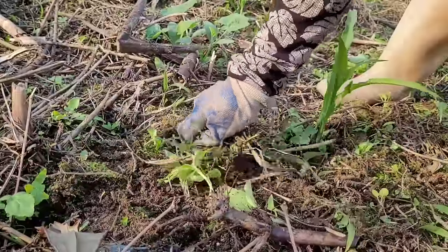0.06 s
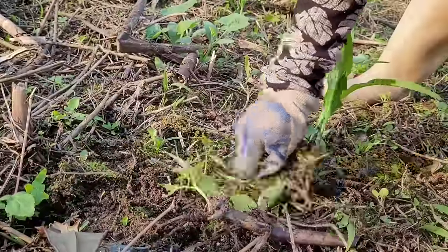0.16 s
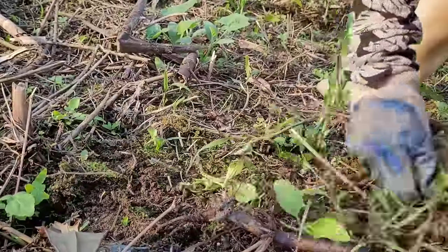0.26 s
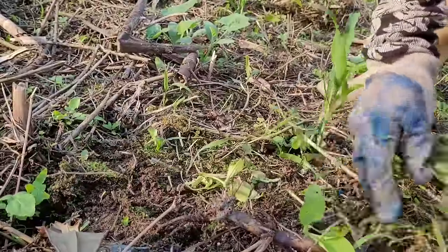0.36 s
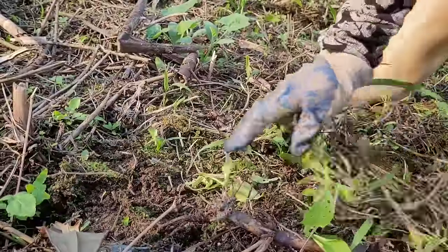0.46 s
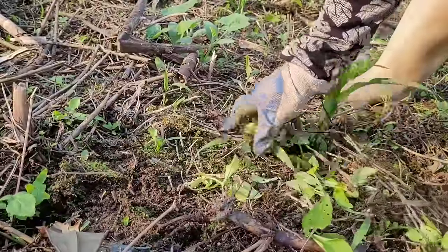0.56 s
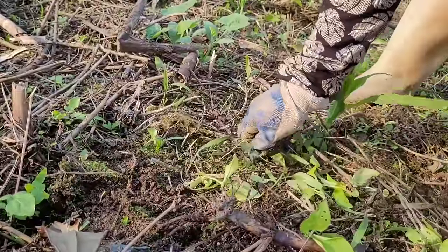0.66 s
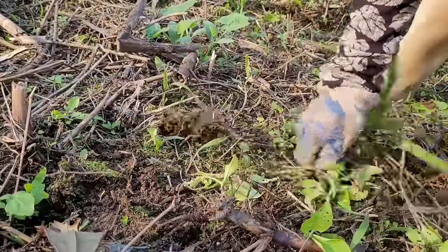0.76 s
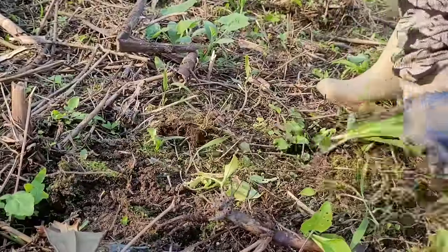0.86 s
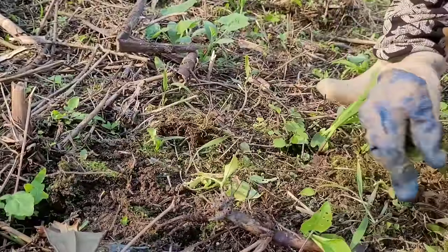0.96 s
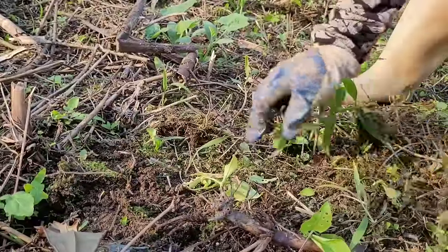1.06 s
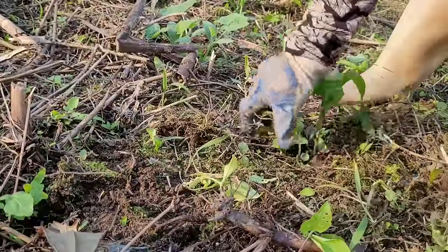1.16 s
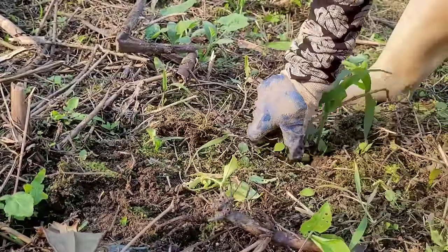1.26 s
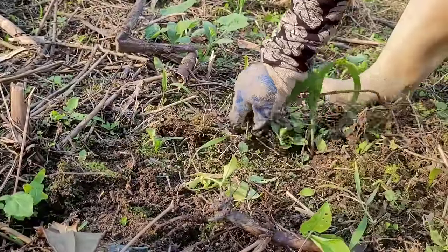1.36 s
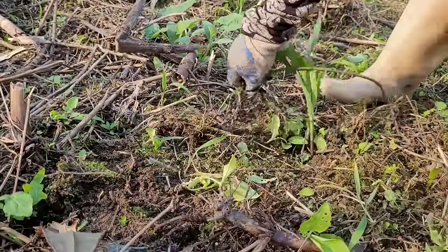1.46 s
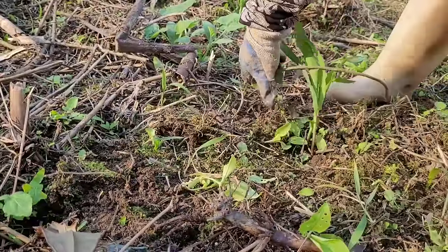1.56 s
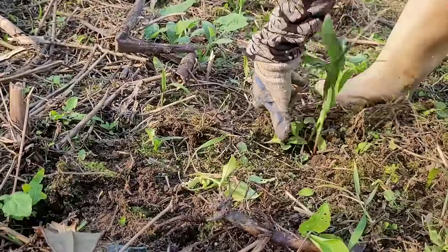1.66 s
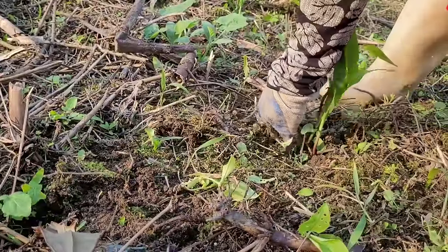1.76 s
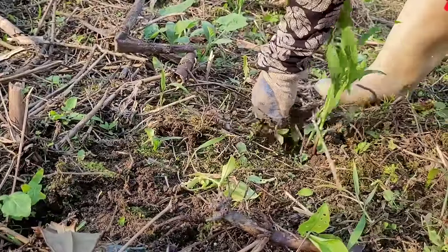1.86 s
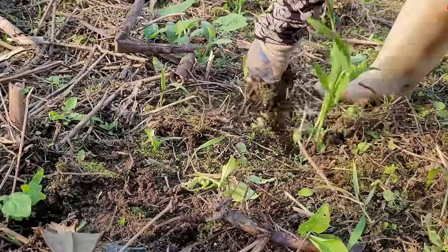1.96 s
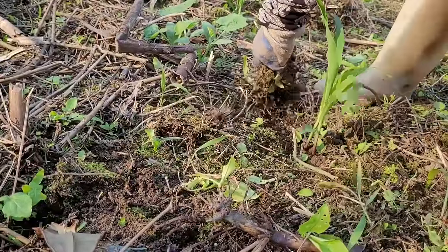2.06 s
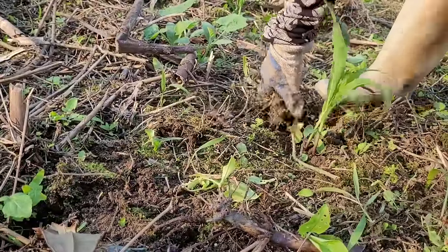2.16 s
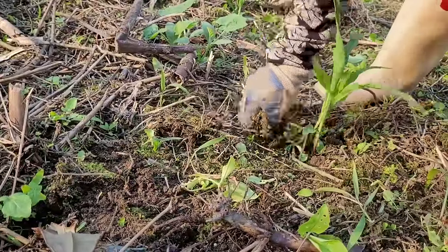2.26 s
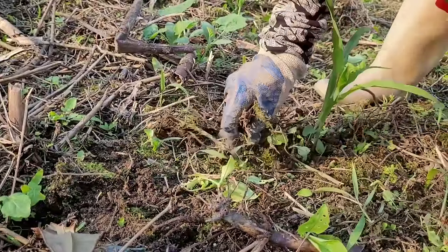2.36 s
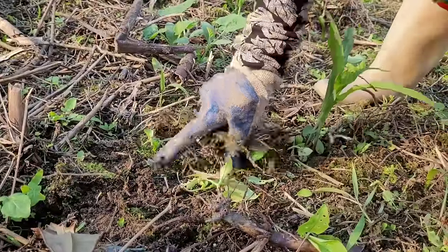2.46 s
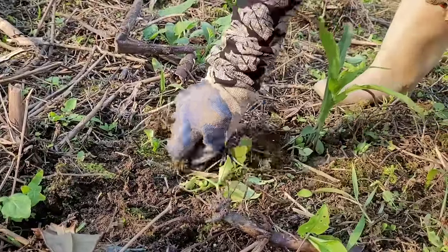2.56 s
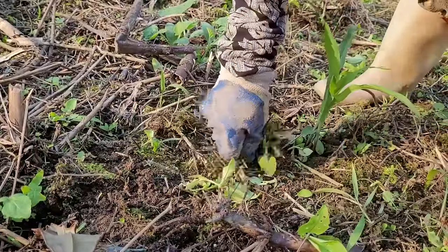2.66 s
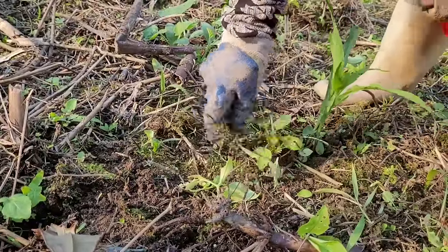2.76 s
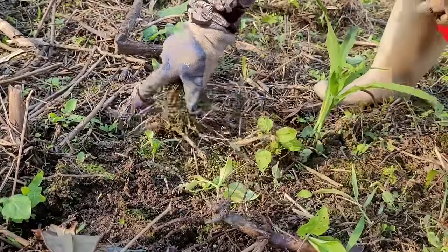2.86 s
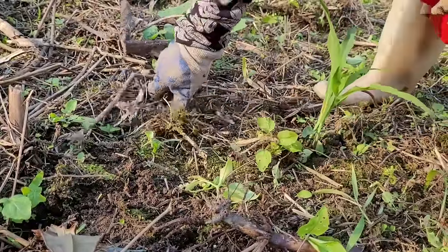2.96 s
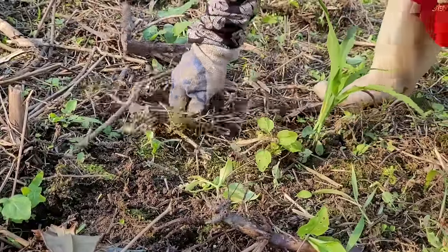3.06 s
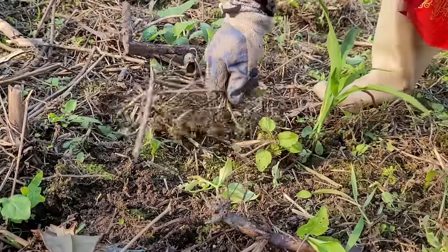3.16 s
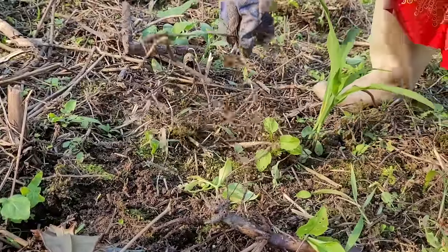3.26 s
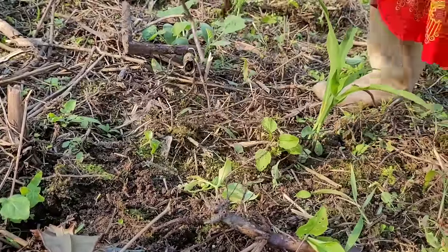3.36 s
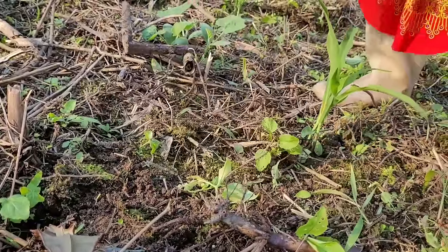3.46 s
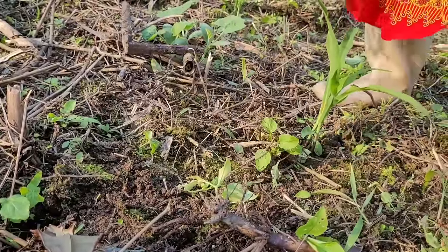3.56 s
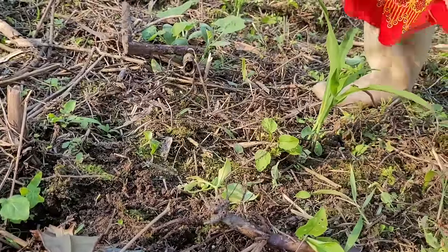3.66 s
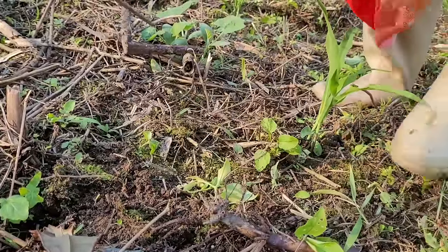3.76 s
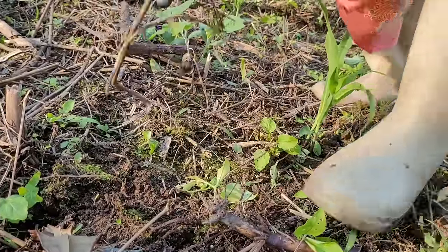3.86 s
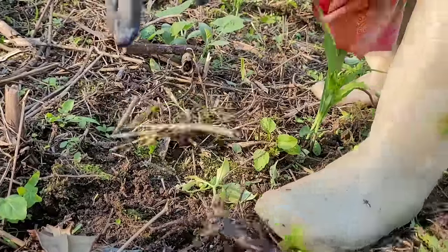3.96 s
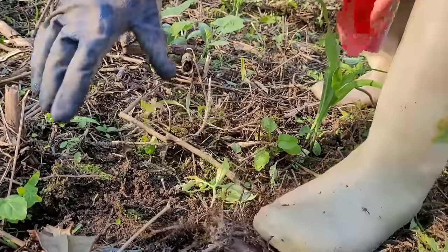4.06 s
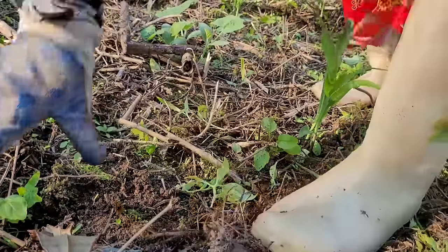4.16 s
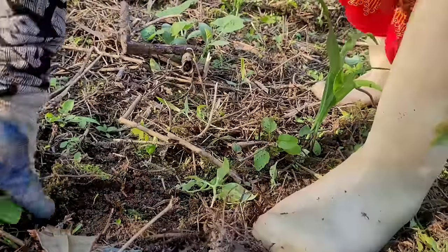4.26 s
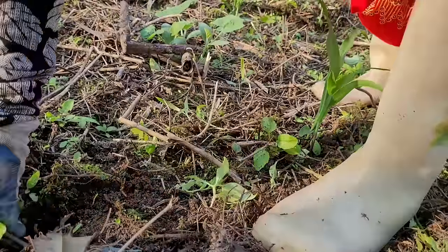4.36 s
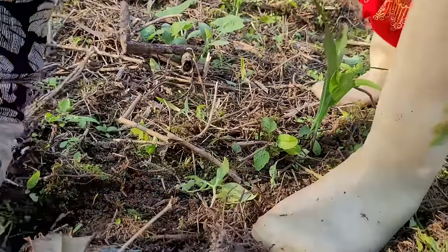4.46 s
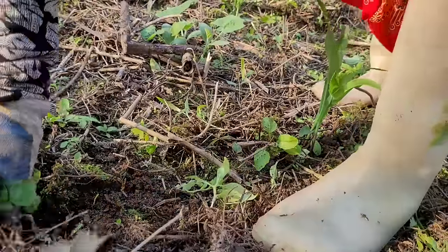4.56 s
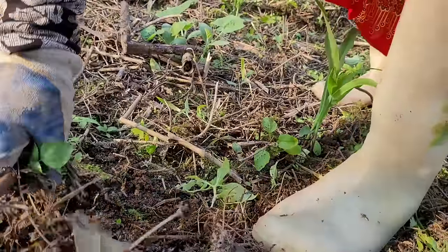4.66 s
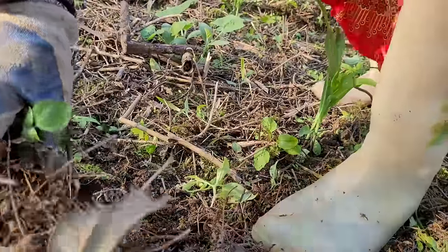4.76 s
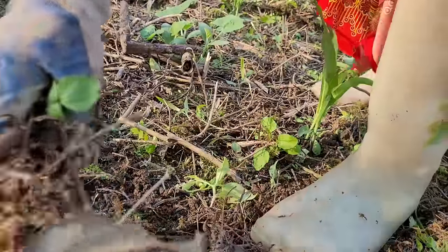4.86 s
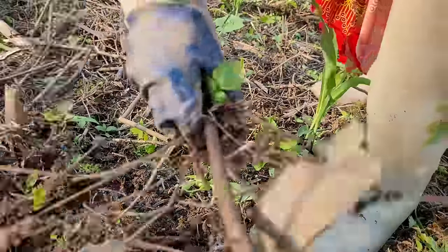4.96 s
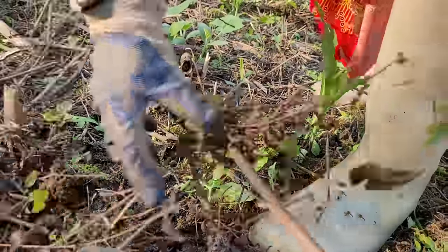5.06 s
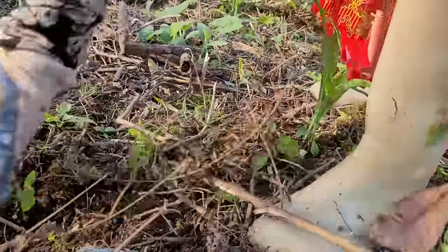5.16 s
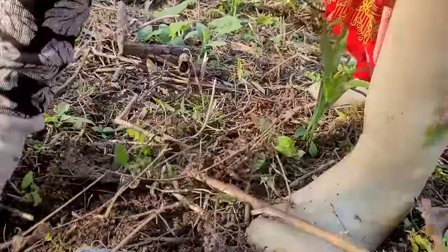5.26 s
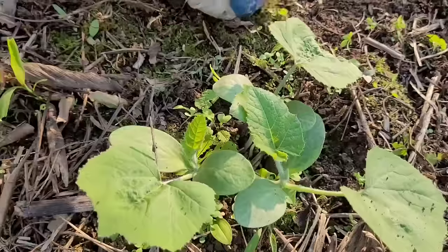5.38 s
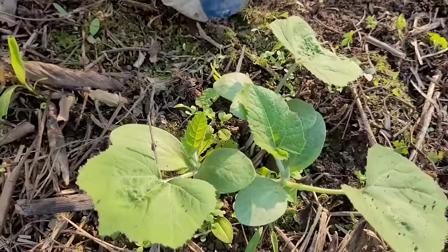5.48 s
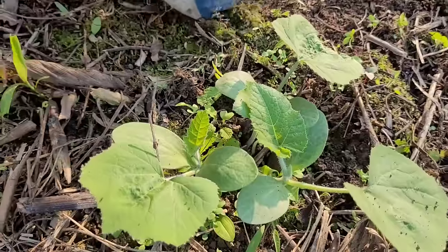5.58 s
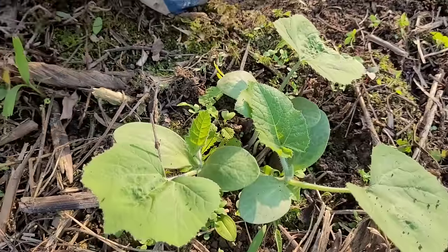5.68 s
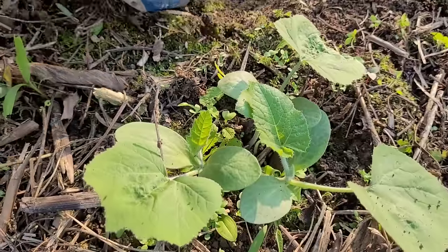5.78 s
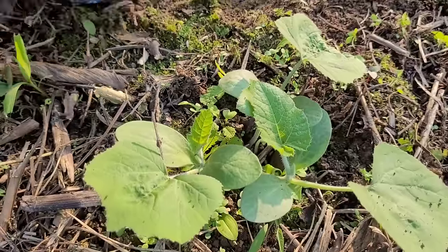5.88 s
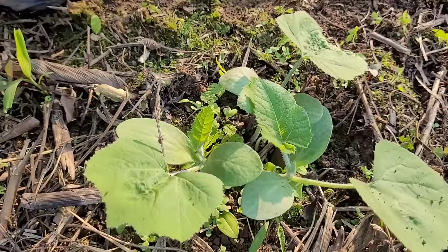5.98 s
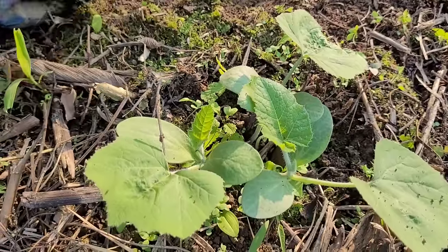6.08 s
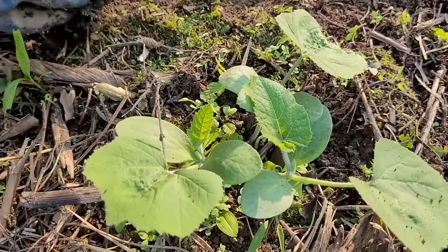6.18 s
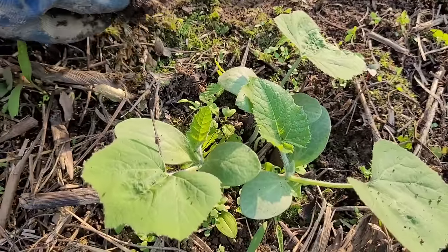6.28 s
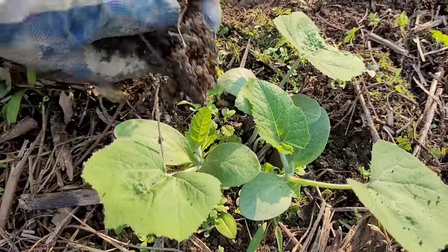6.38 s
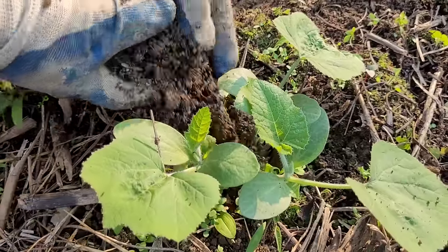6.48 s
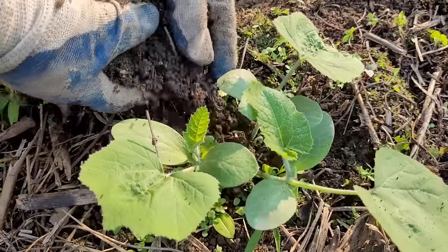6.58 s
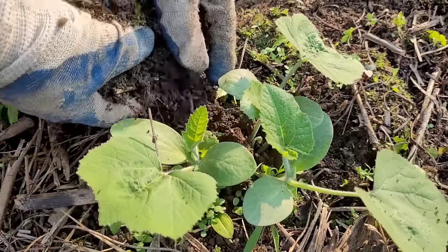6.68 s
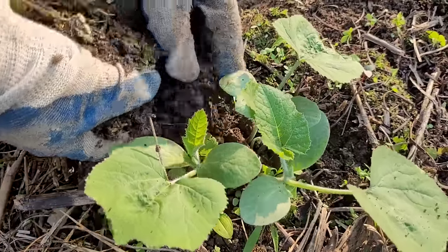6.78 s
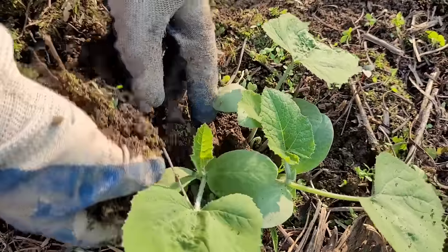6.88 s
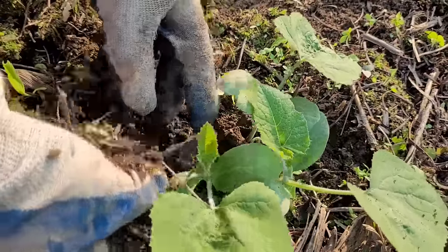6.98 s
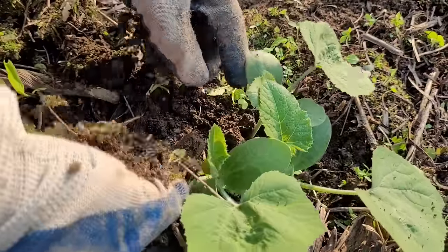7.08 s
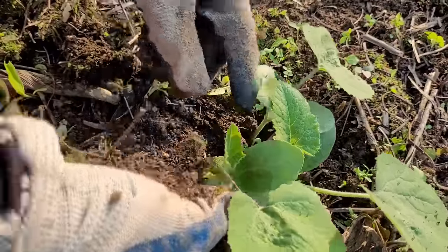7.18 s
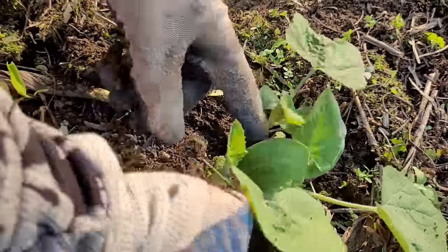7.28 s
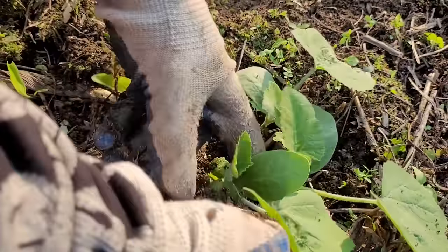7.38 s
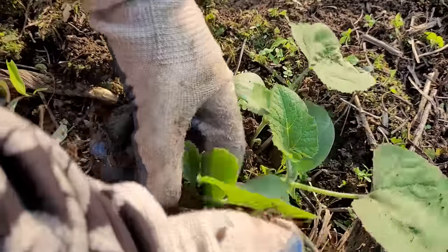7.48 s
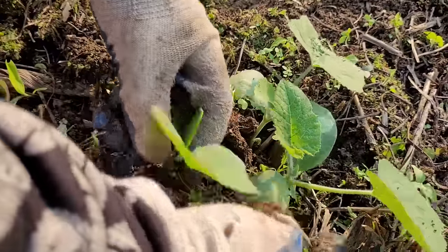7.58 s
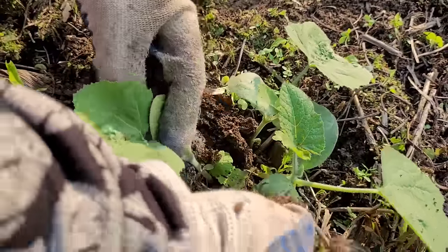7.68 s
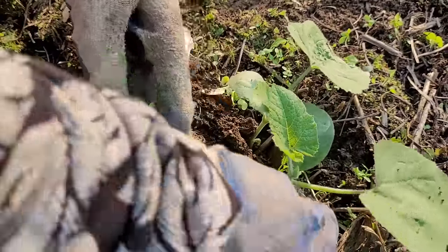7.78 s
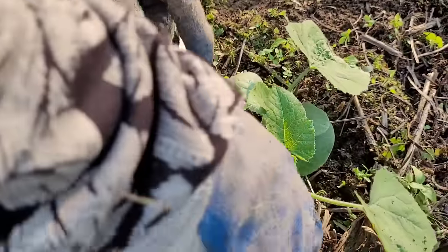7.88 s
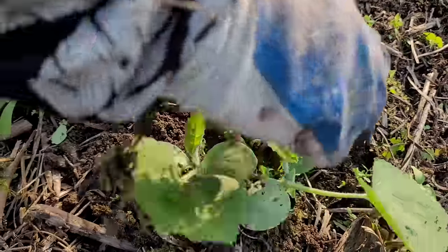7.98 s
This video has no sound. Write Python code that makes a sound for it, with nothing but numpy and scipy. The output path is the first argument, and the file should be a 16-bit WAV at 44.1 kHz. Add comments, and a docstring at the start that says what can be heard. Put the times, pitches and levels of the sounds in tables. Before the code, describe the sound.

Dry stalks crackle and stems snap in uneven handfuls as a gloved hand weeds a garden patch right by the microphone. Soil crumbles and grit bumps the phone. The work pauses briefly, becomes loudest just past the middle with knocking clods and a softly rubbing rubber boot, then continues in lighter rustles. Quiet crickets and a far motor hum carry on in the open air, while a high rasping insect cuts off about halfway.

```python
"""A gloved hand tears weeds and rakes dry stalks and soil, close to a phone with two spaced microphones.
Dense tiny cracks make the rustle, stems snap, a stick and clods knock, grit bumps the phone and a
rubber boot rubs as it settles. Around the patch, crickets and a rasping insect sing over a far motor
hum and faint open-air noise. Twice the sound cuts abruptly, changing the near colour and the insects."""
import sys
import numpy as np
from scipy import signal
from scipy.fft import rfft, irfft, next_fast_len
from scipy.io import wavfile
from scipy.ndimage import uniform_filter1d

SR = 44100
rng = np.random.default_rng(int(sys.argv[2]) if len(sys.argv) > 2 else 0)


def store_pcm(level_fs):
    """Save levels as 16-bit WAV."""
    pcm = np.round(np.clip(level_fs, -1, 1) * 32767).astype(np.int16)
    wavfile.write(sys.argv[1], SR, np.atleast_2d(pcm).T)


N = 354123
TIME = np.arange(N) / SR
CUTS_S = (4.376, 5.468)  # the sound jumps abruptly to a new shot


def undb(db):
    """Decibels to gain."""
    return 10 ** (np.asarray(db) / 20)


def unit(x):
    """Scale to rms 1."""
    return x / np.sqrt(np.mean(x ** 2))


def curve(points, s=TIME):
    """Read a line through (seconds, value) points at s."""
    return np.interp(s, *np.transpose(points))


def colour(x, points):
    """Shape a spectrum by (Hz, dB) points; negative dB at either end doubles beyond it."""
    hz, db = np.transpose(points)
    size = next_fast_len(x.shape[-1])
    log_hz = np.log(np.arange(size // 2 + 1) * SR / size + 1)
    gain = undb(np.interp(log_hz, np.log(hz), db, left=min(db[0], 0) * 2, right=min(db[-1] * 2, db[-1])))
    return irfft(rfft(x, size) * gain, size)[..., :x.shape[-1]]


def band(x, hz, width_hz):
    """A peak that is 20 dB down width_hz to either side; rms 1."""
    return unit(colour(x, [(hz - width_hz, -20), (hz, 0), (hz + width_hz, -20)]))


def walk(rate):
    """Random levels held 1 / rate s and smoothed twice; rms 1."""
    hold = max(int(SR / rate), 2)
    steps = np.repeat(rng.standard_normal(N // hold + 1), hold)
    return unit(uniform_filter1d(uniform_filter1d(steps, hold), hold)[:N])


def sides(pan_db):
    """Left and right gains for a pan, which is left minus right in dB."""
    return undb(np.array([pan_db, -pan_db]) / 2)


def add(out, x, s):
    """Mix a short stereo sound in at s seconds."""
    i = int(s * SR)
    out[:, i:i + x.shape[1]] += x[:, :N - i]


# The hand works nearer the left microphone. Each row: time in seconds, left lead in ms.
LEFT_LEAD = [(0, .07), (3.3, .08), (3.7, 0), (4.0, .26), (4.95, .27), (5.1, 0), (5.45, .1), (5.6, .22),
             (8.03, .16)]
def pair(x, s=TIME, offset_ms=0):
    """A near source at both microphones, the right one late by the lead at s seconds plus offset_ms."""
    lead_ms = curve(LEFT_LEAD, s) + offset_ms
    late = np.arange(len(x)) - np.round(lead_ms * SR / 1000).astype(int)
    return np.array([x, x[late % len(x)]])


def strokes(rows):
    """A time grid and each gesture's power on it: a rise, a hold and a fall, at most 10 dB in 5 ms."""
    start, db, rise, hold, fall = (column[:, None] for column in np.transpose(rows)[:5])
    t = np.arange(0, N / SR + .002, .001)
    early = np.maximum(start - t, 0) / np.maximum(rise, .005)
    late = np.maximum(t - start - np.maximum(hold, 0), 0) / np.maximum(fall, .005)
    return t, undb(db - 10 * early - 10 * late) ** 2


def cracks(per_s, spread_db, decay_ms, patchy_db, spots=3):
    """Tiny random breaks, each a puff of noise, from spots at different angles to the microphones."""
    out, patchy = 0, undb(patchy_db * walk(25))
    pole, chance = np.exp(-1000 / (decay_ms * SR)), per_s / spots / SR
    for spot in np.linspace(-1, 1, spots):
        draw = rng.random(N)
        hit = np.flatnonzero(draw < chance)
        breaks = np.zeros(N)
        breaks[hit] = undb(spread_db * np.minimum(-np.log(draw[hit] / chance), 4.5))  # few are large
        puffs = signal.lfilter([1], [1, -pole], breaks) * patchy
        out = out + pair(puffs * rng.standard_normal(N), offset_ms=.08 * spot)
    return unit(out)


def chips(low_hz, high_hz, per_s, cycles, spread_db=4, sizes=10):
    """Crumbs and splinters of many sizes, each ringing a few cycles at its own pitch as it breaks."""
    out, chance = 0, per_s / sizes / SR
    for place in (np.arange(sizes) + rng.random(sizes)) / sizes:
        hz = low_hz * (high_hz / low_hz) ** place
        draw = rng.random(N)
        breaks = (draw < chance) * undb(spread_db * np.minimum(-np.log(draw / chance + 1e-9), 3.5))
        pole = np.exp(-hz / (cycles * SR))
        resonator = [1, -2 * pole * np.cos(2 * np.pi * hz / SR), pole ** 2]
        out = out + unit(signal.lfilter([1, -1], resonator, breaks))
    return unit(pair(out))


# Grabs, tears and rakes, close in. Each row: time of full strength in seconds, crackle level in dB,
# rise in seconds per 10 dB, hold in seconds, fall in seconds per 10 dB, then chaff, glove and soil
# in dB relative to the crackle.
GRABS = [(.001, -54, .02, 0.028, 0.022, 2, -8, -28), (.052, -50.5, 0.022, 0, 0.023, 6, -4.5, -12),
         (0.111, -48, 0.031, 0, 0.018, 3, -4, -12), (0.214, -50, 0.07, 0.078, 0.05, 3, -3, -13.5),
         (.447, -54.5, 0.18, 0.016, 0.069, -4, -8.5, -21), (.564, -55, 0.081, 0, 0.039, -1.5, -14, -39),
         (0.652, -56.5, 0.0047, 0.089, 0.025, 5, -5, -22), (.819, -52, 0.051, 0.084, 0.084, 1, -4.5, -12),
         (1.392, -55.5, 0.013, 0.011, 0.079, 4, -7, -12.5),
         (1.45, -55.5, 0.026, 0.069, 0.048, 4, -10, -12.5),
         (1.741, -54.5, 0.0096, 0.015, 0.082, 1, -3.5, -5), (1.89, -56, 0.096, 0.026, 0.13, 0.5, -3.5, -31),
         (2.05, -51.5, 0.039, 0.0028, 0.041, 6.5, -7.5, -33),
         (2.332, -52, 0.037, 0.0021, 0.078, 2, -6, -10), (2.42, -59, 0.014, 0.015, 0.037, 3, -5, -2.5),
         (2.641, -58.5, 0.045, 0.0039, 0.011, 9, -6.5, -19),
         (2.699, -58.5, 0.036, 0.034, 0.035, -1, -0.5, -15),
         (3.005, -47.5, 0.039, 0.0056, 0.037, 2, -5.5, -12.5),
         (3.079, -51, 0.027, 0.0048, 0.021, 5, -2.5, -7), (3.17, -52.5, 0.13, 0, 0.049, 5, -7.5, -13),
         (3.255, -58, 0.06, 0, 0.1, 4.5, -9, -30), (3.474, -64, 0.14, 0.0056, 0.15, 4.5, -11.5, -9),
         (4.031, -44.5, 0.045, 0.0031, 0.04, -0.5, -8.5, -6),
         (4.1, -58.5, 0.025, 0.059, 0.21, -1, -5.5, -3.5),
         (4.379, -48, 0.0041, 0.035, 0.14, 2.5, -11.5, -15),
         (4.554, -44.5, 0.099, 0.044, 0.021, 4.5, -6.5, -11),
         (4.635, -43, 0.023, 0.034, .05, 1.5, -8, -10.5), (4.728, -38.5, 0.044, 0, 0.12, 0, -10, -19),
         (4.86, -46.5, 0.061, 0.075, 0.06, 0.5, -10.5, -19.5),
         (4.985, -40, 0.055, 0.027, 0.05, 2, -10.5, -15), (5.05, -48.5, 0.048, 0, 0.076, 8.5, -3.5, -26),
         (5.156, -54, 0.042, 0, 0.024, -5, 3.5, 1.5), (5.2, -41, 0.044, 0.0043, 0.033, 2.5, -6, -4),
         (5.3, -52, 0.19, 0.081, 0.044, -1.5, -4, -9.5), (5.456, -49.5, 0.021, 0, 0.007, -5, 0, -6),
         (5.566, -57, 0.039, 0.0019, 0.093, 0, -15.5, -14.5), (5.737, -56, 0.085, 0.28, 0.35, 1, -15, -19),
         (5.953, -46.5, 0.015, 0, 0.025, 2, -18, -32), (6.024, -43.5, 0.061, 0.023, 0.15, 4, -8.5, -17.5),
         (6.254, -53, 0.12, 0.0014, 0.035, -10, -8.5, -14), (6.3, -53.5, 0.11, 0.28, 0.19, 3, -10.5, -21),
         (6.871, -55.5, 0.16, 0, 0.028, -25, -33, -17), (6.913, -42.5, 0.018, 0, 0.033, -8, -9.5, -15.5),
         (6.959, -48, 0.017, 0.1, 0.038, -0.5, -9.5, -25),
         (7.236, -49.5, 0.014, 0.047, .02, 0.5, -11.5, -37), (7.33, -52, 0.035, 0.0078, 0.011, -3, -9, -32),
         (7.372, -45, 0.0087, 0.0098, 0.019, -1, -8.5, -33),
         (7.42, -54.5, 0.027, 0.096, 0.18, -0.5, -10, -35),
         (7.837, -47.5, 0.026, 0.0055, 0.08, -1.5, -13.5, -48), (8.026, -50.5, 0.063, 0, .1, 0, -18, -21)]
# Loose litter settling between grabs. Each row: time in seconds, crackle level in dB.
SETTLING = [(0, -68), (1.0, -59.5), (1.3, -64.5), (1.7, -63), (2.2, -62.5), (2.9, -64), (3.4, -69),
            (3.7, -69.5), (3.94, -60.5), (4.35, -74), (5.45, -55.5), (5.52, -65), (6.75, -71),
            (7.16, -56.5), (7.75, -61.5), (8.03, -56)]
# The lower part of the stalk crackle, near 4 kHz, swelling and fading.
# Each row: time in seconds, level in dB relative to the crackle.
LOW_CRACKLE_LEVEL = [(0, -7.5), (1.0, -9.5), (2.0, -7), (3.0, -7), (3.9, -10.5), (4.35, -4), (4.8, -9),
                     (5.2, -12), (5.5, -11), (6.3, -8.5), (6.9, -16.5), (8.03, -13)]
# Where the hand works in front of the phone. Each row: time in seconds, pan in dB.
HAND_PAN = [(0, -1), (2.9, -0.5), (3.1, 0.5), (3.6, -3.5), (4.4, 1), (5.0, 0.5), (5.45, -0.5), (5.55, -2.5),
            (6.2, -0.5), (6.9, -0.5), (7.1, -1.5), (8.03, -2.5)]
# The four materials at close range. Each row: frequency in Hz, gain in dB.
STALK_SPECTRUM = [(2500, -32), (3500, -27.5), (4500, 1.5), (6000, 1), (7500, 2), (9500, -0.5),
                  (11500, -22.5)]
CHAFF_SPECTRUM = [(8500, -14.5), (10500, 3), (12500, 4), (15000, 2), (16000, -2)]
GLOVE_SPECTRUM = [(500, -10.5), (800, -7), (1100, -6), (1600, -5.5), (2600, 1), (3300, 0), (4500, -50)]
SOIL_SPECTRUM = [(70, -6), (150, -4.5), (260, 1), (550, 3), (900, -3), (1500, -6)]
def hand():
    """Stalks and dry chaff crackle, the glove scrapes, soil crumbles, all shaken by the same cracks."""
    t, grab_power = strokes(GRABS)
    power = np.vstack([grab_power, undb(curve(SETTLING, t)) ** 2])
    settling_shares_db = [-1.5, -16, -33]  # chaff, glove, soil
    shares = undb(np.vstack([np.array(GRABS)[:, 5:], settling_shares_db]).T) ** 2
    gains = [np.interp(TIME, t, np.sqrt(p)) for p in (power.sum(axis=0), *(shares @ power))]
    fine = cracks(per_s=1100, spread_db=3.1, decay_ms=.7, patchy_db=2)
    coarse = cracks(per_s=500, spread_db=3, decay_ms=3.5, patchy_db=3.5)
    scattered = rng.standard_normal((2, N)) * undb(2.5 * walk(26))  # thrown back by the litter all round
    stalks = unit(colour(fine + .9 * scattered, STALK_SPECTRUM))
    low_crackle = band(fine + 1.3 * coarse + 1.03 * scattered, hz=3940, width_hz=1290)
    stalks += undb(curve(LOW_CRACKLE_LEVEL)) * low_crackle
    stalks += undb(-8.5) * chips(low_hz=4270, high_hz=11900, per_s=420, cycles=11)
    chaff = unit(colour(fine + 1.05 * scattered, CHAFF_SPECTRUM))
    glove = unit(colour(.45 * fine + .5 * coarse + 1.13 * scattered, GLOVE_SPECTRUM))
    glove += undb(-11) * chips(low_hz=594, high_hz=3290, per_s=220, cycles=5.2)
    soil = unit(colour(.42 * fine + coarse, SOIL_SPECTRUM))
    rustle = sum(gain * layer for gain, layer in zip(gains, (stalks, chaff, glove, soil)))
    return rustle * sides(curve(HAND_PAN))


# The cricket chorus, off to the right. Each row: frequency in Hz, gain in dB.
CRICKETS_BLURRED = [(4100, -22), (4500, -8), (4950, -3), (5110, 0), (5300, -4), (5600, -10), (6000, -24)]
CRICKETS_SHARP = [(4600, -26), (4940, -13), (5035, 0), (5100, -7), (5170, -4), (5280, -14), (5700, -26)]
# Its strength at the phone. Each row: time in seconds, level in dB.
CRICKET_LEVEL = [(0, -64.5), (2.8, -65.5), (3.6, -68), (5.46, -67), (5.48, -65), (8.03, -64.5)]
def crickets():
    """Many crickets merge into a steady band of noise, sharper after the second cut."""
    blurred = unit(colour(rng.standard_normal((2, N)), CRICKETS_BLURRED))
    sharp = unit(colour(rng.standard_normal((2, N)), CRICKETS_SHARP))
    chorus = np.where(TIME < CUTS_S[1], blurred, sharp)
    return chorus * undb(curve(CRICKET_LEVEL) + 1.5 * walk(4.1)) * sides(pan_db=-4)[:, None]


# One insect, equally loud at both microphones. Each row: frequency in Hz, gain in dB.
RASP_SPECTRUM = [(6300, -26), (6750, -3), (7100, -3), (7700, -16), (8200, -4), (8600, -2), (9100, -14),
                 (10200, -8), (11500, -16), (13000, -11), (14500, -24)]
# Its strength at the phone. Each row: time in seconds, level during a pulse in dB.
RASP_LEVEL = [(0, -66), (2.2, -65.5), (3.2, -64.5), (3.6, -63), (4.0, -63), (4.4, -65)]
def rasping_insect(pulse_hz=17, peak_s=3.665):
    """A high rasp that pulses until the first cut."""
    pulses = np.clip(.45 + 1.1 * np.cos(2 * np.pi * pulse_hz * (TIME - peak_s)), 0, 1)
    rasp = unit(colour(rng.standard_normal((2, N)), RASP_SPECTRUM)) * pulses * (TIME < CUTS_S[0])
    return rasp * undb(curve(RASP_LEVEL) + walk(8))


# Open air all round the patch. Each row: frequency in Hz, gain in dB.
AIR_SPECTRUM = [(20, -37), (35, 0), (60, -2), (120, -6), (250, -7), (380, -12), (550, -17), (900, -26),
                (1600, -33), (2500, -20), (3500, -20.5), (5500, -4), (10000, -26), (15500, -17.5)]
def air(level_db=-66):
    """Faint outdoor noise, more alike at the two microphones in the bass than in the treble."""
    shared = colour(rng.standard_normal(N), [(20, -5.5), (400, -1), (1500, -12)])
    separate = colour(rng.standard_normal((2, N)), [(20, -2.5), (300, -4), (1200, 3.5)])
    return undb(level_db + .25 * walk(7.8)) * unit(colour(shared + separate, AIR_SPECTRUM))


# A motor far off, the same at both microphones. Each row: frequency in Hz, typical rms level in dB.
MOTOR_TONES = [(53.8, -80), (106, -83.5), (148, -89)]
def motor():
    """A low hum whose tones waver together in pitch and separately in level."""
    wavering_s = TIME + .00083 * walk(4.5)
    return sum(np.sqrt(2) * undb(db + 2.8 * walk(6)) * np.sin(2 * np.pi * hz * wavering_s)
               for hz, db in MOTOR_TONES)


def small_stems(per_s=3, level_db=-48, spread_db=5):
    """Rows like those of STEM_SNAPS for small stems that break at random."""
    when, size, pan, low = rng.random((int(per_s * N / SR), 4)).T
    start_s = .015 + when * (N / SR - .02)
    db = level_db + spread_db * (2 * size - 1)
    pan_db, body_db, shiver_db = 6 * (2 * pan - 1), -30 + 12 * low, np.full_like(when, -18)
    return np.transpose([start_s, db, pan_db, body_db, shiver_db])


def flatten(burst):
    """Level out the broad bumps in a burst's spectrum: a clean break sounds at all pitches alike."""
    spectrum = rfft(burst)
    local_power = uniform_filter1d(abs(spectrum) ** 2, size=31, axis=-1)
    return irfft(spectrum / np.sqrt(local_power), burst.shape[-1])


# Stems breaking close to the phone. Each row: time in seconds, peak level of the crack in dB, pan in dB,
# then low body and trailing shiver in dB relative to the crack.
STEM_SNAPS = [(.0125, -26, -0.5, -10, -9), (.0487, -24, 0, -15, -23), (.0838, -28, 5, -27, -20),
              (.116, -33, 2, -8.5, -10), (.445, -37.5, -2, -7, -22), (.7999, -14, -1, -10.5, -16),
              (.817, -27, 11, -27, -29), (1.116, -42, 0, -35, -10), (1.1575, -41, -5, -30, -8),
              (1.219, -42, 2, -30, -8), (1.292, -43, 0, -30, -3), (1.3838, -33, 4, -30, -20),
              (1.3957, -32, 3, -35, -22), (1.462, -40, 4, -30, -15), (1.4933, -29, 5, -38, -10),
              (1.664, -42, 3, -35, -8), (1.7293, -12, 5, -9.5, -16), (1.771, -44, 1, -13, -20),
              (1.816, -36, 0, -15, -20), (1.868, -39, 0, -30, -12), (1.8866, -44, -2, -1.5, -20),
              (1.9475, -30, -3.5, -10, -11), (1.966, -40, 0, -25, -15), (2.054, -43, 0, -15, -12),
              (2.3411, -30, 0, -27, -10), (2.4205, -39.5, -2, -2.5, -8), (2.447, -38, -2, -30, -15),
              (2.6354, -33, 3, -36, -1), (2.699, -37, 3, -30, -8), (2.8917, -37.5, -1, -21, -7),
              (2.9205, -36, 10, -20, -30), (2.9664, -32.5, 3, -24, -15), (2.996, -35, -2, -14, -20),
              (3.015, -35, 0, -7, -15), (3.056, -35.5, 9, -6, -12), (3.0797, -18, -3, -27, -20),
              (3.2535, -41, 10, -12, -7), (3.527, -44, -8, -14, -12), (3.9303, -41, 2, -23, -18),
              (4.018, -30, -1, -2.5, 1), (4.041, -28, 1, -9, -22), (4.1026, -35, 3, -7.5, -10),
              (4.1145, -33.5, 1, -21, -9), (4.1455, -34, -4, -9, -22), (4.156, -39, 1, -12, -20),
              (4.225, -42.5, 7, -6, -23), (4.234, -41.5, -9, -4, -30), (4.303, -41, -3, -38.5, -23),
              (4.3774, -49, -2, -21, -18.5), (4.5435, -28, 0, -26, -20), (4.555, -32, 2, -23, -15),
              (4.5762, -27, 6, -5.5, -8), (4.588, -31, -2, -15, -18), (4.6262, -9, -6, -18, -16),
              (4.6273, -14, 4.5, -16, -9), (4.7149, -17, 0, -34, -20), (4.793, -26, 0, -25, -18),
              (4.877, -30, 2, -25, -18), (4.8995, -28, 1, -17, -17), (4.9651, -26, 3.5, -25, -12),
              (4.973, -30, 5, -22, -15), (4.9865, -15, -11, -22, -22), (4.993, -32, -3, -24, -16),
              (5.0052, -11.5, -1, -6, -13), (5.089, -33.5, 1, -30, -20), (5.1493, -34, -5, 2, -21),
              (5.173, -30, 5, -19, -18), (5.2003, -24.5, -9.5, 1, 24), (5.3262, -12, -1.5, -20, -25),
              (5.3457, -23, 12.5, -15.5, -24), (5.4438, -15, 3, -18, -32), (5.4449, -13, 4.5, -27, -16),
              (5.463, -31, 0, -15, -22), (5.5959, -39, -6, -27, -7), (5.8396, -32, 1, -18, -6),
              (5.9522, -33, 6, -29, -15), (6.0085, -23.5, 2, -23, -2.5), (6.2387, -32, 2, -29, -12),
              (6.634, -38, -5, -35, -23), (6.666, -46, -7, -32, -22), (6.689, -42, -8, -30, -24),
              (6.774, -42, -10, -44, -17), (6.8108, -32.5, 1, -21, -10), (6.837, -41, -10, -31, -18),
              (6.9037, -28, -7, -24, -9), (6.92, -37, 4, -6, -12), (7.237, -30, -3, -43, -16),
              (7.27, -37, -8, -30, -14), (7.3627, -29, -7, -13, 17), (7.4644, -45, -8, -30, -20),
              (7.8332, -29, -10, -22, 5), (8.0016, -34, -9, -35, -17)]
# The upper and lower parts of a snap. Each row: frequency in Hz, gain in dB.
CRACK_SPECTRUM = [(2500, -35), (4000, -1), (7500, 6.5), (10000, 3), (15000, 5.5), (16000, -5)]
BODY_SPECTRUM = [(350, -13.5), (700, -5), (1200, -0.5), (2000, -2), (3000, 1), (4200, -12), (5500, -30)]
def snaps(rise_ms=.34, shiver_ms=4.2, length=2048):
    """A stem breaks in a brief burst of noise, and its fibres shiver after it."""
    out = np.zeros((2, N))
    ms = np.arange(length) * 1000 / SR - 4  # the break comes 4 ms in
    rise, after = np.exp(np.minimum(ms, 0) / rise_ms), np.maximum(ms, 0)
    for s, db, pan_db, body_db, shiver_db in [*STEM_SNAPS, *small_stems()]:
        decay_ms = max(.91 - .1743 * (db + 24.5), .2)  # louder stems crack faster
        crack = rise * np.exp(-after / decay_ms)
        shiver = rise * undb(shiver_db) * np.exp(-after / shiver_ms)
        direct, scattered = rng.standard_normal(length), rng.standard_normal((2, length))
        # The shiver is mostly thin fibres, so less of it reaches the body.
        parts = (crack + shiver, CRACK_SPECTRUM, 0), (crack + .6 * shiver, BODY_SPECTRUM, body_db)
        for envelope, spectrum, part_db in parts:
            burst = colour(flatten(pair(envelope * direct, s) + envelope * scattered), spectrum)
            burst /= abs(burst).max(axis=1, keepdims=True)
            add(out, undb(db + part_db) * sides(pan_db)[:, None] * burst, s - .004)
    return out


# Stick, clods and boot knock nearby; grit bumps the phone at one microphone. Each row: start in seconds,
# peak at the nearer microphone in dB, pan in dB, pitch in Hz, seconds to fall 60 dB.
GROUND_KNOCKS = [(.434, -42.5, -4.5, 537, 0.0089), (1.7295, -26.5, 21, 272, 0.0082),
                 (2.419, -51.5, 2, 438, 0.014), (3.079, -46, -1, 790, 0.018), (4.028, -49, 1, 159, 0.039),
                 (4.986, -34, 7, 397, 0.01), (5.006, -31, 2.5, 273, 0.015), (5.1, -45.5, -1, 920, 0.0094),
                 (5.122, -44, 2, 372, 0.011), (5.149, -30, 3, 474, 0.0076), (5.161, -35.5, 2, 248, 0.064),
                 (5.171, -61, -4, 264, 0.047), (5.2018, -24, -4.5, 540, 0.015),
                 (6.184, -48.5, 7, 580, 0.032), (6.245, -53, 10, 584, 0.038)]
GRIT_BUMPS = [(1.7292, -21.3, 40, 56.5, .047), (4.03, -56, 2, 60, .05), (5.35, -47, -22, 50, .075),
              (6.025, -52, -24, 55.4, .06), (6.153, -48, 22, 55, .055)]
def thuds(table, push_ms, jolt_rad, hold=1):
    """A heavily damped mode; the jolt starts it pushed aside; hold above 1 swings on, then stops short."""
    out, t = np.zeros((2, N)), np.arange(8192) / SR
    for s, db, pan_db, hz, t60 in table:
        push = 1 - np.exp(-t * 1000 / push_ms)
        fade = np.exp(-np.log(1000) * (t / max(t60, .003)) ** hold)
        ring = np.sin(2 * np.pi * hz * t + jolt_rad) * push * fade
        mic_gains = undb(-np.maximum([-pan_db, pan_db], 0))  # the far microphone gets less
        add(out, undb(db) * mic_gains[:, None] * ring / abs(ring).max(), s)
    return out


# A rubber boot settling beside the phone. Each row: time of full strength in seconds, level in dB,
# rise in seconds per 10 dB, hold in seconds, fall in seconds per 10 dB.
BOOT_RUBS = [(3.474, -72, -0.05, 0.021, 0.1), (3.85, -73.5, .12, .12, 0.5), (4.03, -64, -0.02, .01, 0.06),
             (4.2, -63.5, -0.01, 0.088, -0.04), (4.4, -67.5, 0.12, .12, 0.04), (4.57, -69, 0.07, 0.018, 0),
             (4.736, -63.5, 0, .09, 0.02), (4.9, -70, .05, .04, .05)]
def boot():
    """Uneven rubbing noise resonates in the hollow of the boot."""
    t, power = strokes(BOOT_RUBS)
    rub = band(rng.standard_normal(N), hz=600, width_hz=340) * undb(1.8 * walk(30))
    return rub * np.interp(TIME, t, np.sqrt(power.sum(axis=0)))


# The close-range colour, a list for each of the three shots. Each row: frequency in Hz, gain in dB,
# pan in dB.
SHOT_COLOURS = [
    [(700, -1, -1.5), (1400, -1.5, 1.5), (2120, 1.5, -1), (3000, -0.5, -1), (3400, -3, 0), (4260, -0.5, 0),
     (6300, -2.5, -1.5), (7300, -0.5, -2.5), (9100, 0, 4), (12600, -0.5, 4), (15300, 1, 5)],
    [(700, 0, 1.5), (1400, 1, -1), (2200, 2, 0.5), (2920, -3, -1), (3450, 1.5, 0.5), (4300, 0, -3),
     (6240, -1.5, -3.5), (7450, -0.5, -2), (9200, -3.5, 9), (12500, 0.5, 3.5), (15300, 0.5, 9)],
    [(700, -1.5, 2.5), (2050, 2, 2), (2540, -2, 3.5), (3050, -1.5, 1.5), (3670, -1, 2.5),
     (4330, -1.5, -0.5), (6300, -2.5, -4.5), (6950, -1, -8), (9100, -1, 0.5), (13600, -2.5, 2.5),
     (15700, -2, 9.5)],
]
def near_colour(near):
    """Ground and phone body colour the near sound differently for each microphone and shot."""
    shots = np.split(near, (np.array(CUTS_S) * SR).astype(int), axis=1)
    heard = []
    for shot, rows in zip(shots, SHOT_COLOURS):
        channels = []
        for channel, side in zip(shot, (1, -1)):
            response = [(hz, db + side * pan_db / 2) for hz, db, pan_db in rows]
            channels.append(colour(channel, [(20, 0), *response, (22000, 0)]))
        heard.append(np.array(channels))
    return np.hstack(heard)


def scene():
    """The weeding up close, with insects, air and motor behind it, at the two microphones."""
    knocks = thuds(GROUND_KNOCKS, push_ms=.72, jolt_rad=.95)
    bumps = thuds(GRIT_BUMPS, push_ms=.18, jolt_rad=2.2, hold=3.5)
    weeding = near_colour(hand() + snaps()) + boot() + knocks + bumps
    return weeding + crickets() + rasping_insect() + air() + motor()


def record(dry):
    """The phone rolls the treble off steeply above 15.5 kHz."""
    return signal.sosfilt(signal.ellip(10, .3, 70, 15500, fs=SR, output="sos"), dry)


dry = scene()
out = record(dry)
store_pcm(out)
```